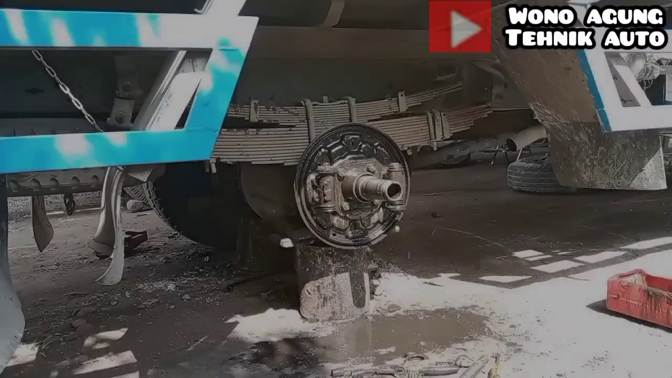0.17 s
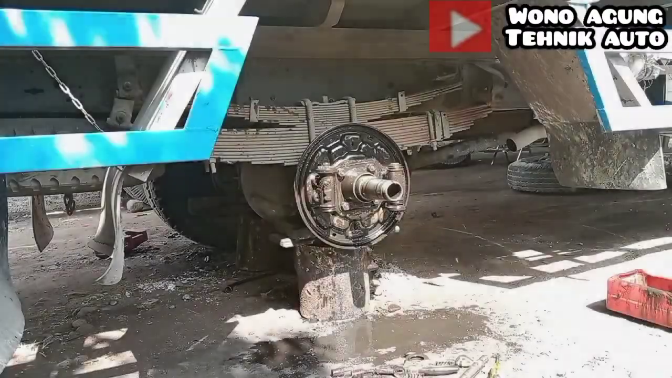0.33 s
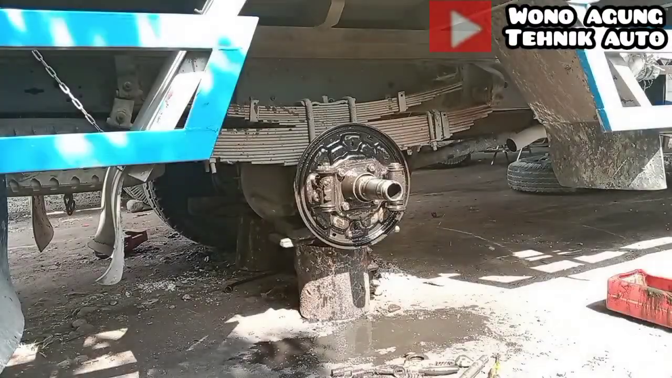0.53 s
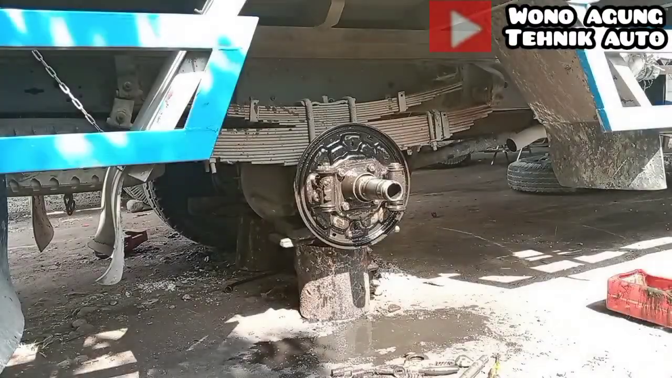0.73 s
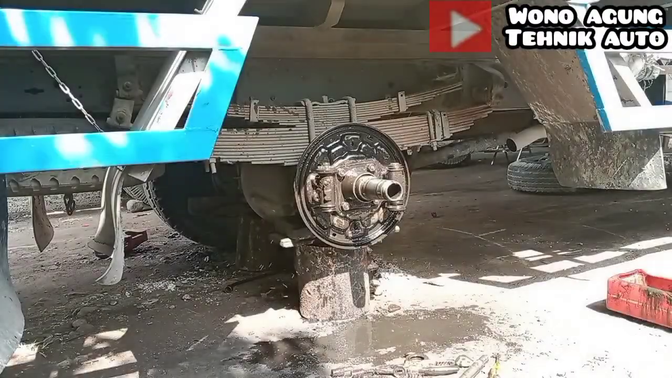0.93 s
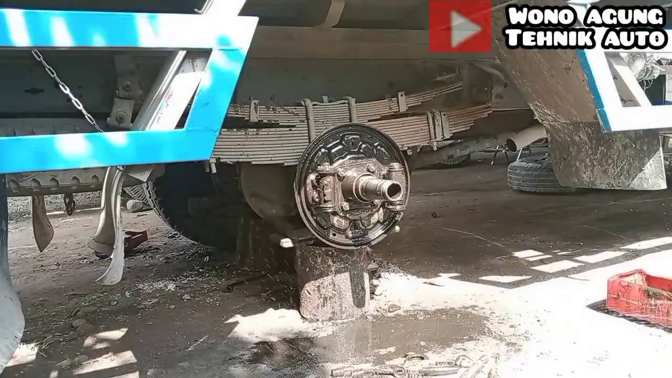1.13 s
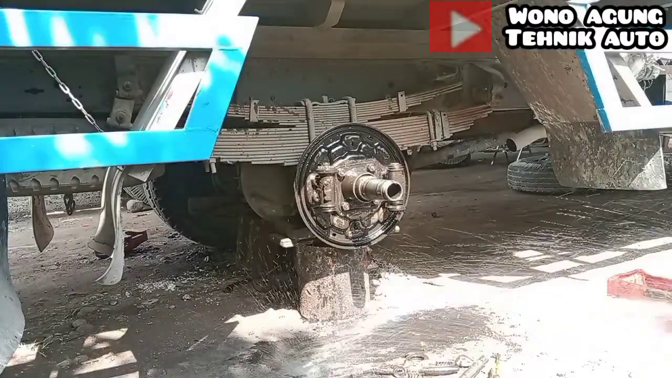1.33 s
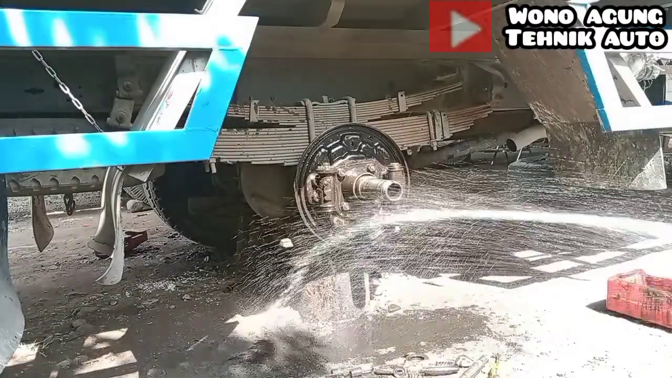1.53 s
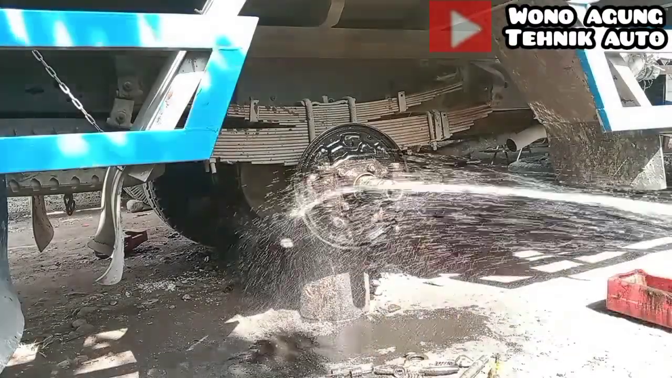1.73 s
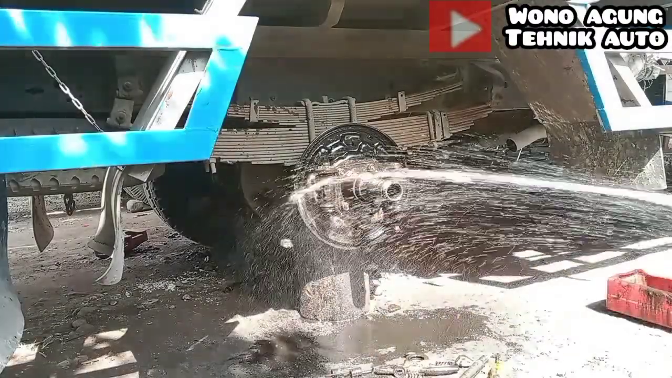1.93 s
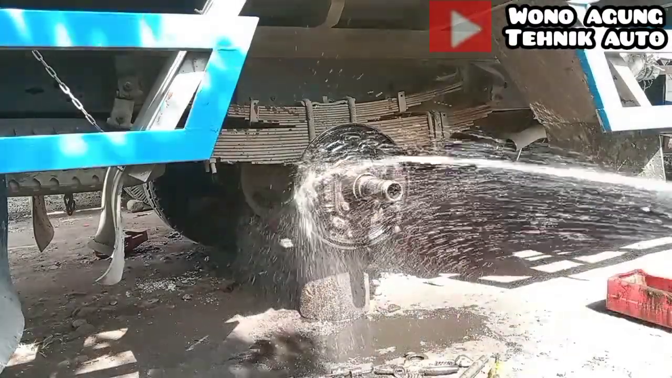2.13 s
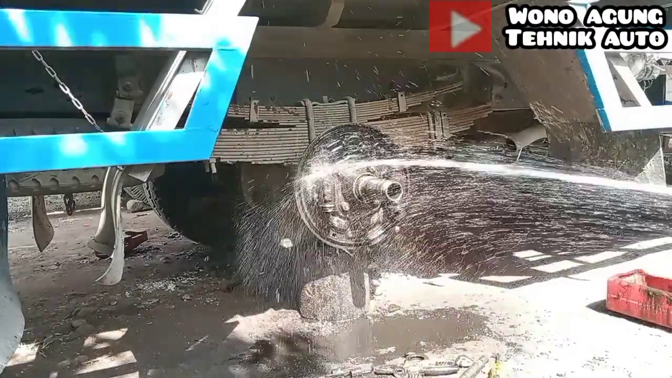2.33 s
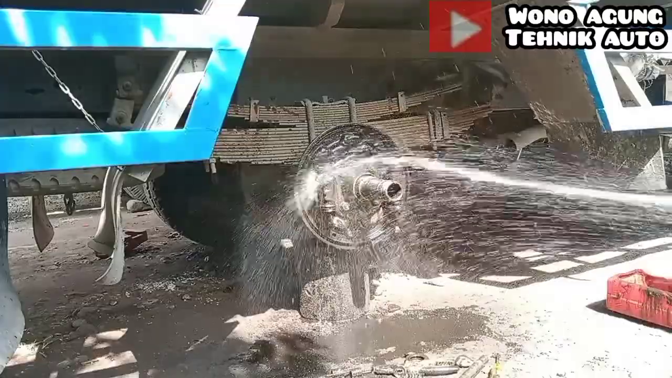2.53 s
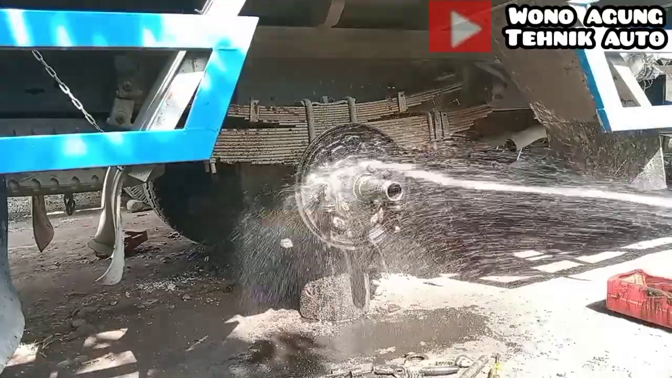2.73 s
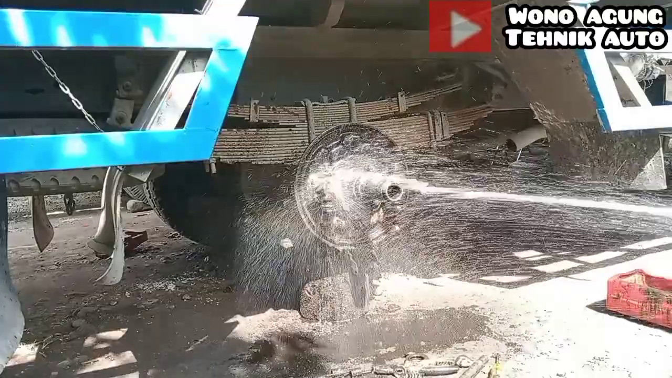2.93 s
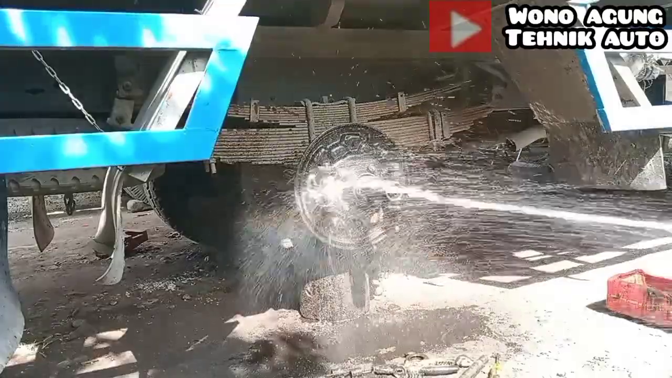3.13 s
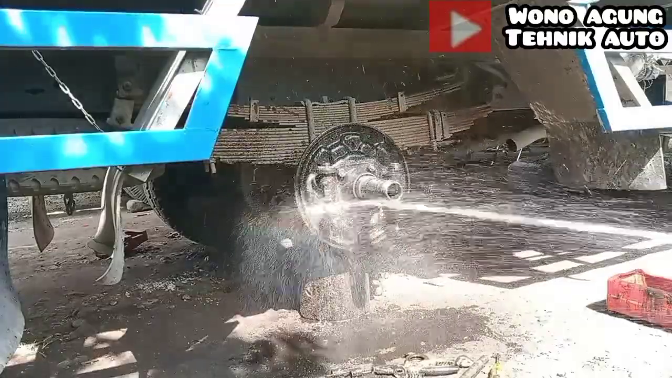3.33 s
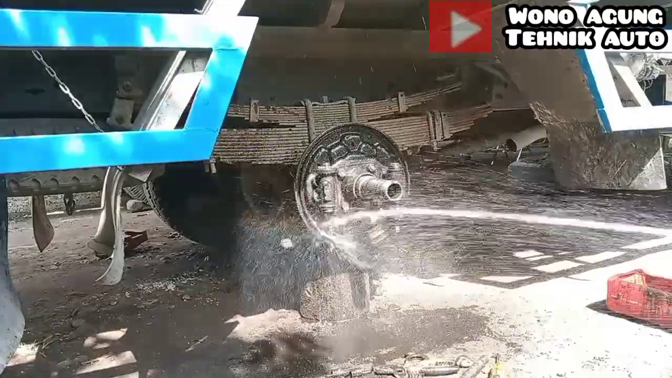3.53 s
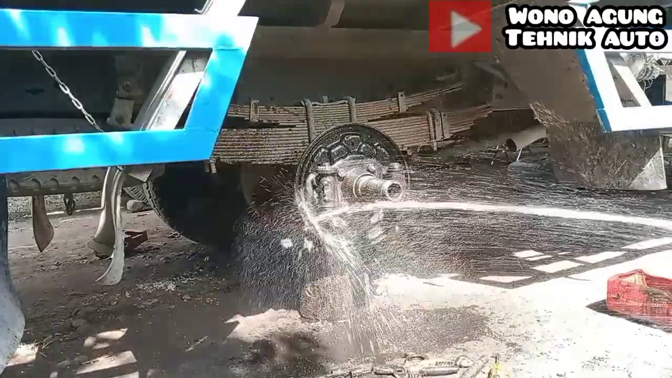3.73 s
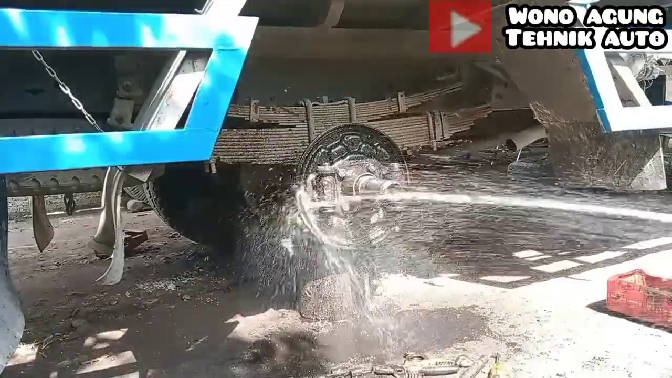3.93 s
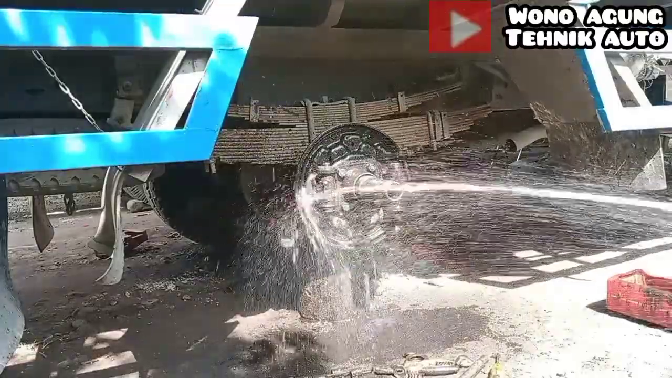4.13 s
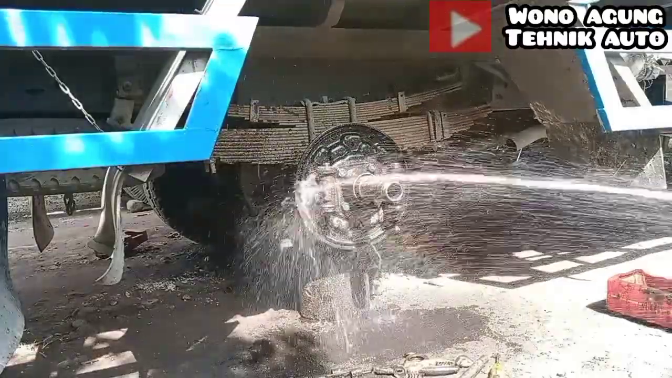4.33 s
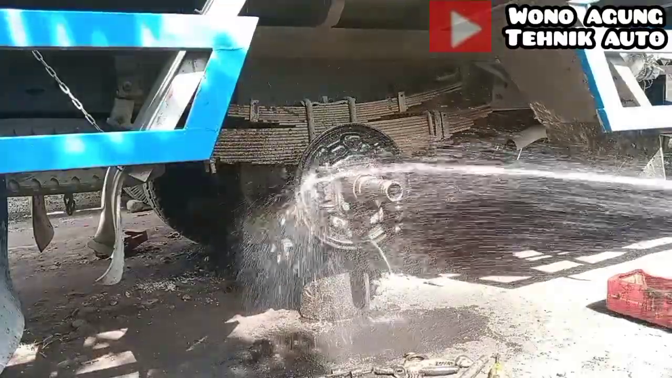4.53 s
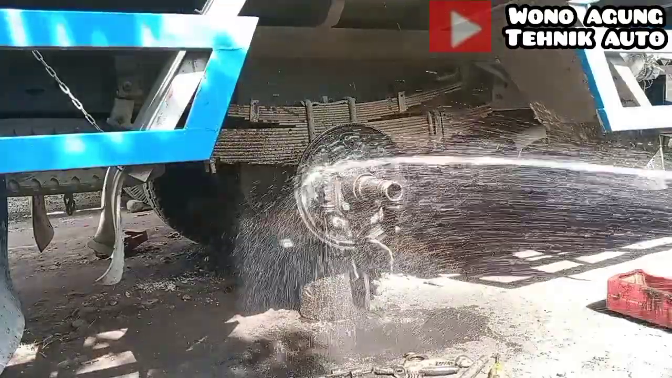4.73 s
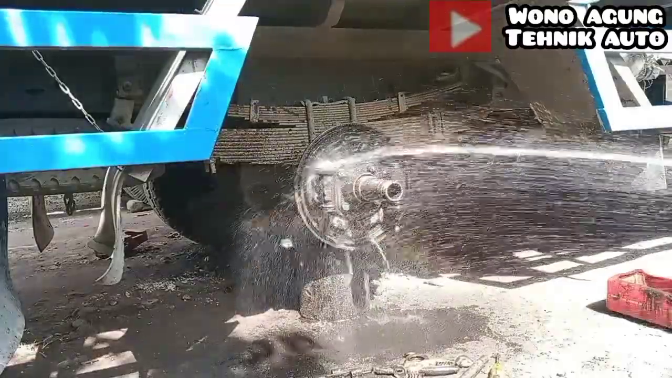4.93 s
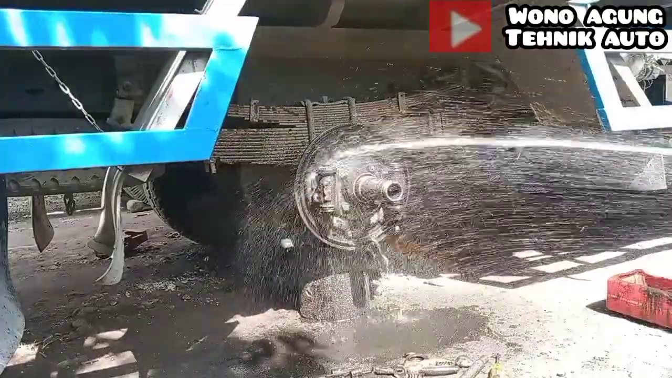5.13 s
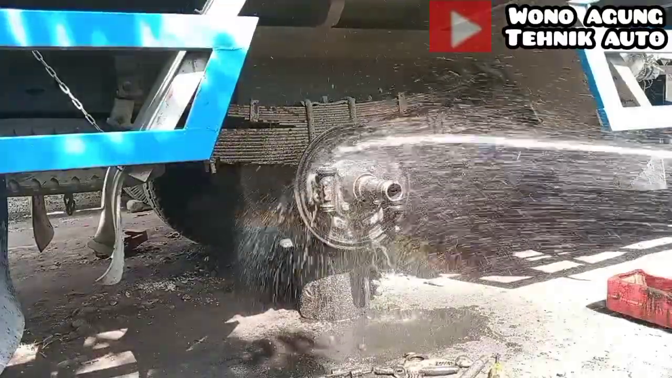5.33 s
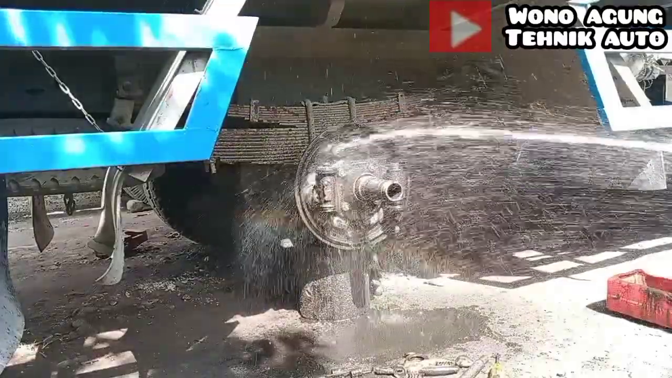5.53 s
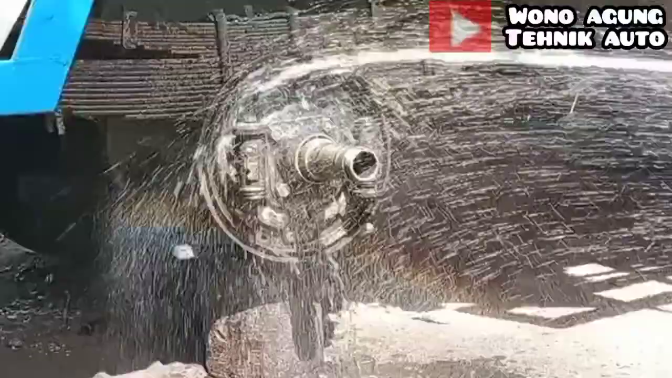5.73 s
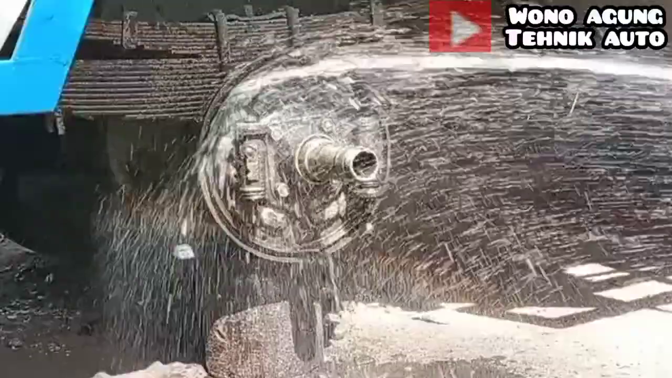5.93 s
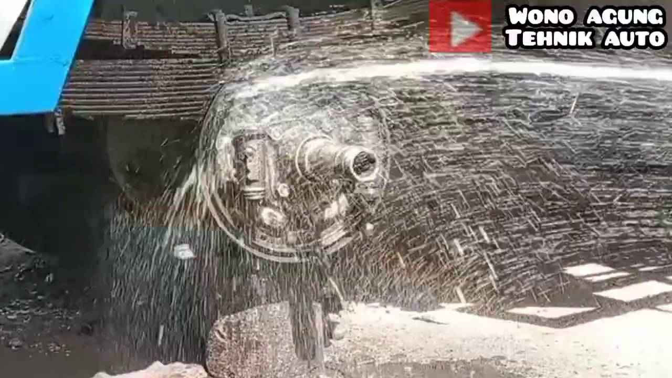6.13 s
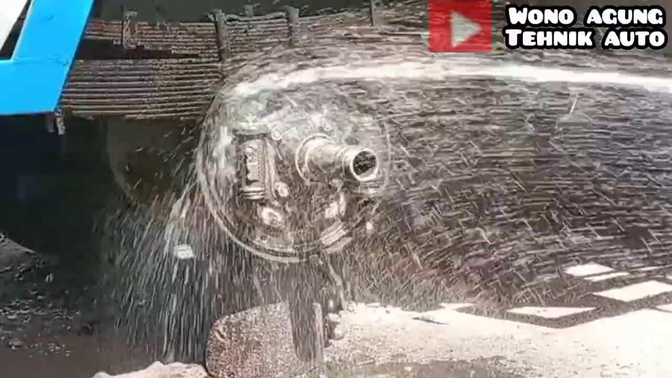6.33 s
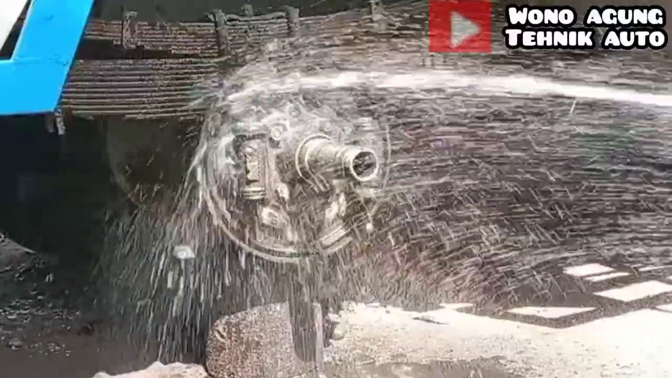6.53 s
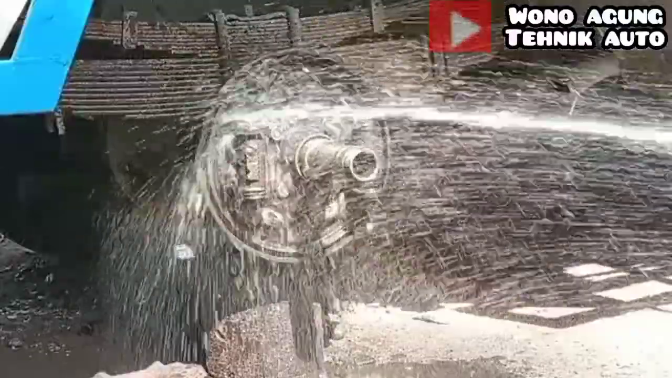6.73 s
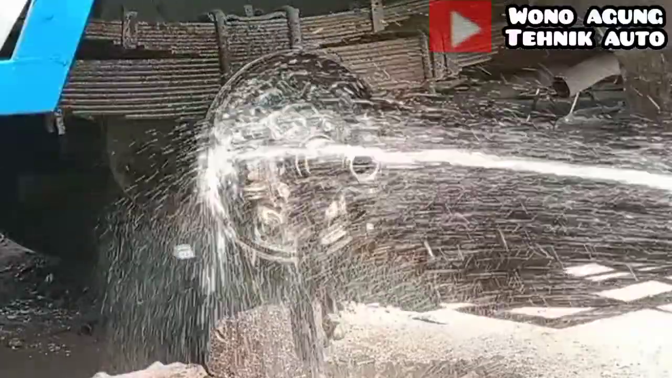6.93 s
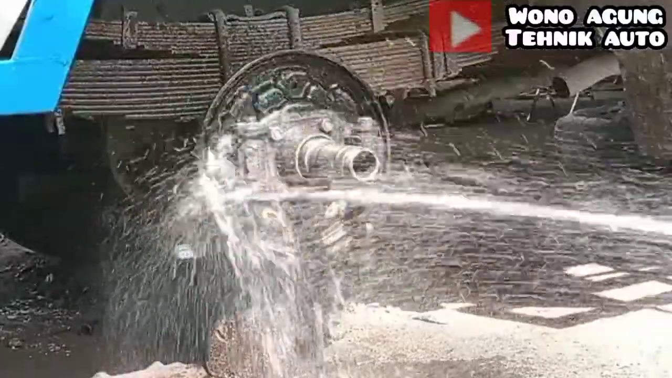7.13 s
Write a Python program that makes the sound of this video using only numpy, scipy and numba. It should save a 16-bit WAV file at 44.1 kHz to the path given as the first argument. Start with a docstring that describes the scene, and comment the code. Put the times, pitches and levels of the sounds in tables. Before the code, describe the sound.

From 0 to 0.8 s a quiet yard rumbles softly; water trickles and gulps, dull hollow knocks sound near 0.1 and 0.35 s, and sharp single drops tick and spit. The drops thicken from 0.8 s into a rising hiss, which thins briefly around 1.5 to 1.9 s. At 1.3 s a low engine drone swells in, uneven and growling, loud until about 3.5 s. Near 2 s a hard splat and hollow thump land as the full jet strikes the steel hub; more knocks follow to 2.6 s. The bright, crackling spray then stays dense, wavering in colour with tiny dropouts around 3.7 to 3.9 s and faint wet metallic ringing. Soft low engine throbs return now and then. Hollow watery knocks cluster at 4.8 s, strong cracks hit at 5.2, 5.35 and 5.45 s, and splattering hiss carries on until the cut at 7.2 s.

```python
"""A hose jet on wet ground and a steel wheel hub in a yard, with an engine in the distance.
At first the yard rumbles softly, water trickles and gulps, and hollow knocks and splats stand out.
The hiss of random drops builds up over two seconds; ringing filters make the wet steel sound.
From about 1.3 to 3.5 s the engine, a stack of sine waves and rumble, drones loudly, later in brief swells.
Splats, short noise cracks with an echo and a fizz, go on to the end; the strongest come near 2 and 5.3 s."""
import sys
import numpy as np
from scipy import signal
from scipy.fft import rfft, irfft
from scipy.io import wavfile
from scipy.ndimage import uniform_filter1d, minimum_filter1d
from numba import njit

SR = 44100
rng = np.random.default_rng(int(sys.argv[2]) if len(sys.argv) > 2 else 0)


def wav_out(sig):
    """Save sig, one row per channel (or a flat mono array), as 16-bit PCM at SR to the path in sys.argv[1]."""
    wavfile.write(sys.argv[1], SR, np.round(np.clip(np.atleast_2d(sig).T, -1, 1) * 32767).astype(np.int16))


N = 316197  # length in samples

# How strong the jet is before its brief lulls: t/s, spray level/dB, heavy drops level/dB
JET_LEVELS = [(0.0, -57.5, -48), (0.14, -47.5, -54), (0.26, -46.5, -52), (0.52, -44.5, -53),
              (0.64, -43.5, -63), (0.76, -43, -72), (0.86, -38.5, -49), (1.0, -35, -42.5),
              (1.18, -34.5, -48), (1.26, -33, -40.5), (1.38, -35, -45), (1.44, -41, -75), (1.62, -44, -62),
              (1.74, -38, -45.5), (1.84, -47, -69), (1.96, -28.5, -34.5), (2.08, -28, -32),
              (2.12, -34, -43), (2.41, -33, -43.5), (2.56, -30.5, -36), (2.97, -32, -45),
              (3.33, -30.5, -41.5), (3.55, -29, -39.5), (3.71, -28.5, -40.5), (3.93, -30, -38.5),
              (4.29, -30.5, -38.5), (4.41, -33, -36.5), (4.49, -28.5, -37), (4.63, -29.5, -37),
              (4.71, -36, -43.5), (4.91, -33.5, -41), (5.19, -27.5, -40), (5.49, -28.5, -37.5),
              (5.65, -30.5, -47.5), (5.85, -31.5, -42), (5.97, -27.5, -31.5), (6.03, -28, -35.5),
              (6.41, -29, -39), (6.55, -28, -35), (6.95, -29.5, -37.5), (7.17, -30.5, -35.5)]
# Pitches at which the wet steel hub rings: f/Hz, width/Hz, level/dB among the modes
HUB_MODES = [(994, 32, -10.5), (1373, 74, 2), (1562, 120, -13), (1703, 50, -11), (2063, 52, -1.5),
             (2310, 100, 8), (2740, 34, 3.5), (3100, 56, 8), (3446, 30, 9.5), (4140, 52, 7), (4790, 37, 0)]
TRICKLE_TOP_HZ = 2000  # the trickle rings the hub's modes below this, the heavy drops those above
SWELL_DB, SWELLS_PER_S = 4.5, 12  # how far and how often the level of a hub mode wanders
DRIFT = .015  # share by which the ringing pitches wander as the water film changes
PATCHY_DB = 10  # how deeply the dull water sounds hollow out
GROUND_ECHO_S = .0021  # delay of the echo off the ground


def undb(db):
    """Turns decibels into a plain gain."""
    return 10 ** (np.asarray(db) / 20)


def unit(x):
    """Scales a sound to an rms of 1."""
    return x / np.sqrt(np.mean(x ** 2))


def curves(table):
    """Joins the columns of a table by straight lines in time, one value a sample."""
    s, *columns = np.transpose(table)
    return [np.interp(np.arange(N) / SR, s, c) for c in columns]


def colour(x, points):
    """Filters with the given (f/Hz, gain/dB) curve, without any sound ahead of its cause."""
    hz, db = np.transpose(points)
    grid_hz = np.linspace(1, SR / 2, 2049)
    gain = undb(np.interp(np.log(grid_hz), np.log(hz), db))
    # folding the cepstrum (the spectrum of the log gain) puts the whole response after time zero
    cepstrum = irfft(np.log(gain))
    cepstrum[1:2048] *= 2
    cepstrum[2049:] = 0
    response = irfft(np.exp(rfft(cepstrum)))
    rows = signal.fftconvolve(np.atleast_2d(x), response[None], axes=1)
    return rows[:, :x.shape[-1]].reshape(x.shape)


def band(x, lo_hz, hi_hz):
    """Keeps only the sound between two pitches."""
    return signal.sosfilt(signal.butter(5, [lo_hz, hi_hz], "band", fs=SR, output="sos"), x)


@njit
def svf(x, hz, q):
    """Resonator whose centre may move, with a gain of 1 there; a higher q is narrower."""
    y, b, l = np.empty(len(x)), 0., 0.
    for i in range(len(x)):
        g, k = np.tan(np.pi * hz[i] / SR), 1 / q
        v = (b + g * (x[i] - l)) / (1 + g * (g + k))
        b, l, y[i] = 2 * v - b, l + 2 * g * v, k * v
    return y


def walk(rate):
    """Wanders from one random level to the next, rate times a second, with a spread near 1."""
    k = int(SR / rate)
    steps = np.repeat(rng.standard_normal(N // k + 1), k)
    return 1.344 * uniform_filter1d(steps, k)[:N]


def span(start_s, end_s, fade_s):
    """1 between the two times, with soft ends."""
    t = np.arange(N) / SR
    return np.clip(np.minimum(t - start_s, end_s - t) / fade_s + .5, 0, 1)


def burst(start_s, length_s, attack_s, release_s):
    """Rises, holds, then dies away."""
    t = np.arange(N) / SR - start_s
    return np.clip(t / attack_s, 0, 1) * np.exp(-np.maximum(t - length_s, 0) / release_s)


def drops(per_s, spread_db, tail_s):
    """Random impacts of unequal but bounded size, each a burst of noise that dies away."""
    size_db = spread_db * np.minimum(rng.exponential(size=N), 4)
    hits = (rng.random(N) < per_s / SR) * undb(size_db) ** 2
    # the tail acts on power, so the amplitude takes twice as long to die away
    power = signal.lfilter([1], [1, -np.exp(-1 / (tail_s * SR))], hits)
    return np.sqrt(power) * rng.standard_normal(N)


def patchy(x, lo_hz, hi_hz, spread_db, rate):
    """Splits a sound into quarter-octave strips that hollow out on their own."""
    edges = lo_hz * 2 ** np.arange(0, np.log2(hi_hz / lo_hz) + .2, .25)
    return sum(undb(-spread_db * np.abs(walk(rate))) * band(x, a, b) for a, b in zip(edges, edges[1:]))


def three_bands(x, lowest_hz):
    """Gives a sound the spray's colour and splits it into dull, middle and sharp parts."""
    # Colour of the spray: f/Hz, level/dB per Hz
    spray_colour = [(600, -59), (1000, -30.5), (1900, -21.5), (2360, -15), (2960, -10), (3300, -5.5),
                    (3960, -8), (5060, -1), (5750, 1.5), (8450, -4.5), (9200, -6), (14900, -1.5),
                    (16000, 2)]
    x = colour(x, spray_colour)
    return [band(x, lowest_hz, 4690), band(x, 4883, 9160), band(x, 9430, 17670)]


def hub_ring(water, modes, drifts_per_s):
    """Water makes the steel ring: each mode is a resonator, fed in its own swells and drifting in pitch."""
    ring = 0
    for hz, width_hz, db in modes:
        pitch = hz * (1 + DRIFT * walk(drifts_per_s))
        mode = unit(svf(water, pitch, hz / width_hz))
        ring = ring + undb(db + SWELL_DB * walk(SWELLS_PER_S)) * mode
    return unit(ring)


def yard_murmur():
    """Filtered noise that wavers in level: the background of the yard."""
    # Colour of the background: f/Hz, level/dB per Hz
    yard_colour = [(12, -14), (25, -28.5), (91, -6.5), (147, -10.5), (340, -32), (520, -31), (750, -31),
                   (1180, -48), (2130, -40), (4500, -45), (6000, -73)]
    noise = band(colour(rng.standard_normal(N), yard_colour), 19, 5000)
    return undb(-52) * unit(noise * undb(4.1 * walk(10)))


def lulls():
    """Gain that dips in the brief gaps of the spray."""
    # Gaps: start t/s, end t/s, level/dB
    gaps = [(0.288, 0.35, -5), (0.59, 0.607, -2), (1.53, 1.594, -6), (1.788, 1.81, -5), (1.832, 1.851, -18),
            (1.865, 1.907, -8.5), (3.16, 3.207, -2.5), (3.697, 3.711, -12.5), (3.718, 3.746, -30),
            (3.81, 3.835, -15), (3.863, 3.904, -8.5), (4.068, 4.117, -4.5), (5.155, 5.264, -6),
            (5.749, 5.76, -7), (6.04, 6.1, -3), (6.293, 6.327, -6), (6.923, 6.943, -6)]
    return undb(sum(db * span(a, b, .02) for a, b, db in gaps))


def jet():
    """Drops patter in flurries over a smooth hiss; the heavy ones also ring the wet steel."""
    spray_db, heavy_db = curves(JET_LEVELS)
    # the mist follows the spray more gently: -29.5 dB at a spray of -32.5 dB, building up in 0.18 s
    build_up = 1 - np.exp(-np.arange(N) / SR / .18)
    mist = undb(-29.5 + .81 * (spray_db + 32.5)) * build_up
    flurry = undb(0.4 * walk(45) + 1.8 * walk(130))
    water = flurry * (unit(drops(700, 2.16, 0.00078)) + 0.76 * rng.standard_normal(N))
    dull, middle, sharp = three_bands(water, 1520)
    # fine droplets of their own add to the mist
    fine = three_bands(drops(1100, 6.0, 0.00056), 1800)[2]
    sharp = unit(sharp) + 0.79 * unit(fine)
    ring = hub_ring(water, [mode for mode in HUB_MODES if mode[0] > TRICKLE_TOP_HZ], 5)
    # the jet wanders, so its colour shifts
    dull = unit(patchy(dull, 1480, 5000, PATCHY_DB, 9)) * undb(0.82 * walk(25))
    heavy = unit(dull + .55 * ring)
    middle = unit(patchy(middle, 3990, 11000, 2.3, 13))
    return lulls() * (undb(heavy_db) * heavy + undb(spray_db) * middle + mist * unit(sharp))


def grounded(x):
    """Adds the echo off the wet ground, which combs the hiss."""
    lag, echo = int(GROUND_ECHO_S * SR), undb(-12)
    return (x + echo * np.pad(x, (lag, 0))[:N]) / np.hypot(1, echo)


def trickle():
    """Water running off under the hub feeds its lowest modes, each in its own swells."""
    # Strength of the trickle before the lulls: t/s, level/dB
    trickle_levels = [(0.0, -39), (0.06, -44), (0.44, -68), (0.76, -73.5), (1.02, -64), (1.48, -68),
                      (1.98, -57), (2.1, -52.5), (2.37, -43), (2.43, -46), (2.79, -54.5), (3.53, -50),
                      (3.67, -50.5), (4.27, -52), (4.51, -47), (4.93, -47), (5.13, -46.5), (5.6, -44.5),
                      (5.72, -43), (5.85, -42.5), (6.25, -50.5), (6.61, -44), (6.85, -52.5), (7.17, -49)]
    water = unit(drops(400, 5.8, 0.0053)) + 0.59 * rng.standard_normal(N)
    ring = hub_ring(water, [mode for mode in HUB_MODES if mode[0] < TRICKLE_TOP_HZ], 5.4)
    wash = unit(patchy(water, 993, 2400, PATCHY_DB, 11))
    return undb(curves(trickle_levels)[0]) * lulls() * band(ring + 0.5 * wash, 947, 3300)


def dipped(x):
    """Takes a wandering band out of the sound of the water."""
    # Missing band: t/s, f/Hz, depth (0 to 1)
    dip_path = [(0, 2550, 0), (0.3, 2300, 1), (0.6, 2260, 1), (0.9, 2500, 0.75), (1.25, 2300, 1),
                (1.5, 2500, 0.8), (2.0, 1850, .6), (2.17, 2800, 0.06), (2.32, 2900, 1), (2.5, 2700, 1),
                (2.66, 2320, 0.6), (2.85, 2100, 0.6), (3.2, 2130, .8), (3.4, 2330, 0.65), (3.55, 2580, 1),
                (3.7, 2240, 0.9), (4.1, 2040, 0.7), (4.45, 1830, 0.6), (4.7, 2800, 0), (5.0, 2720, 0.4),
                (5.3, 2780, 0.64), (5.5, 1980, 0), (5.7, 2560, 0), (5.92, 1730, 0.75), (6.4, 1820, 0.16),
                (7.05, 1900, 0.7), (7.17, 2100, .7)]
    hz, depth = curves(dip_path)
    return x - np.clip(depth, 0, .97) * svf(x, hz, 2.87)


def slosh():
    """Water gulps in a hollow: splashes through resonators whose pitch leans to the loudest gulp."""
    # Gulps: start t/s, length/s, level/dB, centre f/Hz
    gulp_rows = [(-.02, 0.076, -46.5, 880), (0.12, 0.041, -46, 800), (0.338, 0.076, -48, 875),
                 (0.632, 0.006, -44.5, 2320), (0.813, 0.011, -40, 1820), (1.273, 0.064, -53, 1600),
                 (1.622, 0.069, -56, 1290), (1.924, 0.053, -42.5, 1140), (2.226, 0.064, -44, 1380),
                 (2.295, 0.061, -38, 1200), (2.326, 0.096, -34, 1210), (2.555, 0.057, -37.5, 1100),
                 (2.766, 0.036, -53, 885), (3.569, 0.12, -48.5, 1450), (4.134, 0.041, -55, 1540),
                 (4.416, 0.03, -53, 1060), (4.597, 0.031, -47.5, 1310), (4.749, 0.057, -35, 1250),
                 (4.828, 0.078, -36.5, 1220), (5.07, 0.099, -48.5, 790), (5.37, 0.022, -37, 1410),
                 (6.155, 0.033, -42.5, 1290), (6.605, 0.12, -57, 750)]
    attack_s, release_s = .0075, .022
    parts = [undb(db) * burst(s, length, attack_s, release_s) + 1e-9 for s, length, db, _ in gulp_rows]
    gain = sum(parts)
    hz = sum(part * row[-1] for part, row in zip(parts, gulp_rows)) / gain
    splashes = unit(drops(300, 4.5, .006)) + 0.61 * rng.standard_normal(N)
    hollow = unit(svf(svf(svf(splashes, hz, 1.4), hz, 1.4), hz, 1.4))
    overtone = unit(svf(svf(splashes, 1.58 * hz, 2.5), 3.2 * hz, 2.5))
    narrow = unit(svf(splashes, hz, 16.))
    return gain * band(hollow + 0.66 * overtone + 0.065 * narrow, 450, 2460)


def engine():
    """Multiples (orders) of one low pitch waver on their own, and broad rumble blurs them."""
    # Path of the engine: t/s, third order f/Hz, level/dB, upper band level/dB above that level
    engine_path = [(0, 125, -57, 0), (1.05, 118, -52.5, -14.5), (1.3, 117, -31.5, -29),
                   (1.5, 119, -26, -24), (1.6, 130, -25, -11.5), (1.66, 141, -21.5, -16),
                   (1.72, 140, -24.5, -16), (1.8, 136, -20.5, -11.5), (1.88, 133, -32.5, -6.5),
                   (1.97, 136, -23, -27), (2.06, 136, -23.5, -22), (2.14, 136, -33, -24),
                   (2.24, 135, -24.5, -22), (2.285, 134, -26, -26), (2.34, 133, -21, -12),
                   (2.42, 132, -24, -15), (2.51, 130, -23.5, -7.5), (2.62, 128, -21.5, -23),
                   (2.7, 128, -24, -9), (2.78, 127, -21.5, -23), (2.85, 127, -24, -19),
                   (2.94, 126, -24, -27), (3.02, 126, -24.5, -8.5), (3.1, 125, -20, -25.5),
                   (3.18, 124, -27.5, -20), (3.25, 120, -20.5, -8), (3.34, 120, -25.5, -11),
                   (3.46, 120, -26, -12), (3.55, 119, -44, -11), (4.6, 112, -59.5, -3),
                   (4.9, 150, -48, -11.5), (5.57, 148, -59, -4), (5.66, 106, -50, -12),
                   (5.84, 106, -47, -2), (5.93, 144, -53, -13), (7.17, 143, -54, -11.5)]
    # Its orders: multiple of the firing rate, level/dB
    order_levels = [(1, -28), (2, -7.5), (3, 3), (4, -5), (5, -15), (6, -18.5), (7, -25.5), (8, -35),
                    (9, -43), (10, -44)]
    # Its rumble: f/Hz, width/Hz, level/dB
    rumble_bands = [(98, 23, -27), (134, 65, 3), (197.6, 33, -11), (268, 45, -22.5)]
    # Brief swells added to the drone: start t/s, length/s, level/dB
    swell_rows = [(0.234, 0.14, -40), (0.429, 0.055, -43), (0.7, 0.061, -34), (0.86, 0.04, -43),
                  (1.093, 0.043, -44), (3.643, 0.13, -39), (3.832, 0.012, -39), (4.024, 0.19, -34.5),
                  (4.275, 0.11, -33.5), (4.453, 0.11, -38), (4.965, 0.1, -35), (5.44, 0.11, -29),
                  (5.656, 0.26, -41), (5.973, 0.15, -30.5), (6.367, 0.13, -35.5), (6.59, 0.096, -36.5),
                  (6.734, 0.14, -33.5), (7.039, 0.1, -37)]
    hz, db, upper_db = curves(engine_path)
    turns = np.cumsum(hz / 3 * (1 + .006 * walk(25)) / SR)
    orders = 0
    for k, order_db in order_levels:
        tone = np.sin(2 * np.pi * (k * turns + rng.random()))
        orders = orders + undb(order_db + 3.5 * walk(14)) * tone
    rumble = 0
    for f, width_hz, g in rumble_bands:
        centre, q = np.full(N, 1. * f), f / width_hz
        rumble = rumble + undb(g) * unit(svf(svf(rng.standard_normal(N), centre, q), centre, q))
    drone = unit(orders) + 0.56 * unit(rumble)
    swells = sum(undb(g) * span(s, s + length, .046) for s, length, g in swell_rows)
    low = (undb(db) + swells) * unit(band(drone, 42.5, 183.5))
    # the upper band follows the swells only a little
    upper_gain = undb(db + upper_db + 2 * walk(12)) * (1 + 0.082 * swells / undb(db))
    return low + upper_gain * unit(band(drone, 192.4, 364))


def knocks():
    """A soft blow rings the short modes near its centre pitch: sine waves that die away."""
    # Blows: t/s, peak level/dB, centre f/Hz, spread/octaves, share of the ring time (last two at least 0.1)
    blows = [(0.012, -38.5, 700, 0.63, 0.74), (0.121, -31.5, 485, 0.92, 0.34),
             (0.341, -26.5, 880, 0.8, 0.84), (0.344, -40, 420, 0.31, 0.49), (1.92, -15, 930, 0.54, 0.49),
             (1.922, -28, 367, 0.54, 0.48), (2.244, -26, 1270, 0.54, 1), (2.261, -24, 1510, 0.28, 0.096),
             (2.265, -32, 634, 0.22, 0.5), (2.334, -21, 1120, 0.5, 0.81), (2.515, -37, 664, 0.28, 0.82),
             (2.571, -30, 1070, 0.18, 0.93), (2.62, -25.5, 630, 0.21, 0.35), (2.76, -38, 1000, 0.28, 0.44),
             (2.795, -38, 630, 0.55, 0.79), (3.107, -47, 474, 0.41, 0.19), (3.714, -34, 810, 1.34, 0.27),
             (3.831, -38, 910, 0.93, 0.12), (3.842, -40, 700, 0.95, 0.094), (4.312, -44, 1260, 0.17, 0.5),
             (4.389, -30, 1360, 0.15, 0.32), (4.452, -36.5, 1040, 0.16, 0.74), (4.772, -17, 1230, 0.2, 1),
             (4.784, -14, 1200, 0.28, 0.47), (4.826, -16.5, 1180, 0.15, 0.47),
             (4.85, -26, 1260, 0.15, 0.59), (4.881, -25, 1340, 0.24, 0.59), (5.114, -47, 770, 0.33, 1),
             (5.681, -29.5, 734, 0.35, 0.75), (5.767, -27, 736, 0.21, 0.75),
             (5.768, -30.5, 1520, 0.18, 0.61)]
    # Modes of the hollow: f/Hz, level/dB, full time to fall by 60 dB/s
    hollow_modes = [(312, -7, 0.42), (431, 3.5, 0.16), (614, -17, 0.35), (624, 2, 0.18), (692, 9.5, 0.077),
                    (754, 2.5, 0.12), (1002, 1.5, 0.15), (1043, 3, 0.18), (1276, 13, 0.08),
                    (1247, -11, 0.2), (1514, 1, 0.15), (1810, -1, 0.16), (2020, -25, 0.072)]
    out, t = np.zeros(N + 8192), np.arange(8192) / SR
    scatter_db = 2 * rng.standard_normal((len(blows), len(hollow_modes)))
    for (s, db, centre_hz, spread, share), scatter in zip(blows, scatter_db):
        ring = np.zeros(len(t))
        for (hz, mode_db, t60), extra_db in zip(hollow_modes, scatter):
            nearness = np.exp(-.5 * (np.log2(hz / centre_hz) / max(spread, .1)) ** 2)
            decay = np.exp(-np.log(1000) * t / (t60 * max(share, .1)))
            ring += undb(mode_db + extra_db) * nearness * np.sin(2 * np.pi * hz * t) * decay
        ring *= 1 - np.exp(-t / 0.0036)  # soft start
        i = int(s * SR)
        out[i:i + len(t)] += undb(db) * ring / np.abs(ring).max()
    return out[:N]


def small_slugs():
    """Scatters small slugs of water at random; they follow the spray and weaken in its gaps."""
    # Mean/dB, spread/dB; rows: peak above the spray, then dull, sharp and fizz parts above the peak
    slug_levels = [(6.5, 3), (-16, 6), (3, 4), (-20, 6.5)]
    count = 50
    mean_db, spread_db = np.transpose(slug_levels)
    rows = mean_db + spread_db * rng.standard_normal((count, len(mean_db)))
    s = rng.random(count) * N / SR
    spray_db = np.interp(s, *np.transpose(JET_LEVELS)[:2])
    lull_db = 20 * np.log10(lulls()[(s * SR).astype(int)])
    rows[:, 0] += spray_db + 2 * lull_db
    return np.column_stack([s, rows]).tolist()


def splats():
    """Each slug of water cracks sharply, echoes off the ground, then fizzes out."""
    # Big slugs: t/s, crack peak level/dB in the middle band, dull part/dB and sharp part/dB above that peak,
    # rms level/dB of the fizz in its first 4 ms above the crack peak of the same part
    big_slugs = [(0.096, -33.5, 2.5, -15, -22), (0.209, -30, -9, -10, -6), (0.262, -30.5, -1, -3, -11),
                 (0.2367, -28.5, -5, 4, -24), (0.333, -35, -18, 15, -30), (0.386, -25.5, -3.5, -17, -7.5),
                 (0.411, -29, 1, -10, -22), (0.4321, -17.5, -1, -20, -19.5), (0.488, -27, 3.5, 3, -8.5),
                 (0.507, -32, 0, -8, -14), (0.531, -24, -5, 3, -16), (0.6396, -25, -1, -7, -17),
                 (0.658, -25, 1, -3, -25), (0.693, -22, -34, -11, -25), (0.7093, -19.5, -29, -28, -26),
                 (0.728, -28, -17, -8, -14), (0.806, -25, -10, -6, -12), (0.8125, -24, -3, -6, -19),
                 (0.8188, -20.5, 4, -12, -11), (0.855, -24, -3, 3, -10.5), (0.884, -23.5, 4, -8, -17),
                 (0.8913, -27, -4, 10, -10), (0.898, -20, -8, -1, -28), (0.903, -22, 4, -6, -15),
                 (0.9377, -21, -24, -5, -16), (0.986, -27.5, 2, -5, -12), (1.1032, -15, -36, -10, -17),
                 (1.3113, -20.5, -0.5, 2, -7), (1.3821, -21, -34, -3, -10), (1.519, -24, -30, -15, -17),
                 (1.597, -38, -34, 19, -27), (1.6306, -31, -7, 5, -4), (1.65, -22.5, -8.5, 1, -7.5),
                 (1.7563, -22, -16, 6.5, -16), (1.822, -23.5, -26, 1, -13), (1.906, -25, -6, 2, -22),
                 (1.941, -20, -1, 6, -15), (1.983, -19.5, 5.5, 3, -10.5), (2.0049, -0.5, -4.5, -18, -18),
                 (2.061, -14, 3.5, -13, -18), (2.0864, -13.5, 10.5, -18, -20), (2.111, -20, 10.5, -10, -16),
                 (2.134, -20, -3.5, -9, -7.5), (2.182, -17, -11.5, -1, -12), (2.3496, -12, 0.5, 5.5, -27),
                 (2.404, -11.5, -4, -1, -24), (2.4655, -8, -27, 8.5, -24), (2.516, -19, -5, -7, -2.5),
                 (2.5637, -17, -9, 0, -23), (2.702, -20, -13, 2, -6), (2.732, -10.5, -29, 2, -16),
                 (2.7527, -11, -21, -5, -27), (2.8533, -13.5, -2, -16, -22), (2.8796, -21, -22, -4, -21),
                 (2.8989, -16.5, -22, 6, -13), (2.9328, -11, -11, 5, -17), (2.9803, -8.5, -29, 4, -18),
                 (2.9888, -12.5, -11, -10, -14), (3.0571, -15.5, -1.5, -20, -10),
                 (3.111, -13.5, -7.5, 2, -10.5), (3.1388, -14, -10, 2, -10), (3.211, -17, -5.5, 0, -11),
                 (3.288, -25, 6, -10, -10.5), (3.3715, -14, -19, 4, -15), (3.4195, -13, -1, -3, -16),
                 (3.444, -14, -5.5, -4, -8.5), (3.5231, -23, -8, -4, -12), (3.5364, -19, 1, -7, -9),
                 (3.548, -19, -1, -2, -9), (3.567, -19, 0.5, -6, -12), (3.714, -8.5, -12, -5, -19),
                 (3.723, -9.5, -12, 1, -42), (3.831, -8, -13, 0, -29), (3.842, -16, -21, 2, -35),
                 (3.868, -21, -14, -4, -9), (4.0544, -15, 1, 6, -20), (4.064, -15, 3, -11, -19),
                 (4.0836, -20, -7, 15, -34), (4.1876, -12.5, 0, -11, -37), (4.153, -21.5, 1, -8, -14),
                 (4.2375, -10.5, -15, 4, -20), (4.241, -11, -14, 2, -18), (4.282, -22, -17, 0, -22),
                 (4.284, -18, -17, 0, -20), (4.303, -17, 3, -6, -16), (4.346, -20, -8, -6, -18),
                 (4.217, -23.5, 11, -6, -17), (4.2707, -8.5, -19, -11, -27), (4.2892, -9, -5, -5, -29),
                 (4.312, -18, 0.5, -14, -12), (4.329, -15.5, 1, -2, -15), (4.369, -12, -5, -12, -18),
                 (4.39, -23, -4, -6, -20), (4.406, -16, -6, 4, -14), (4.416, -19, -2, -4, -15),
                 (4.448, -13.5, -4, -8, -19), (4.437, -13, -3, -8, -24), (4.4742, -16.5, -6, 7, -16),
                 (4.4917, -12.5, -7, -4, -16), (4.4993, -11.5, -11, -9, -16), (4.508, -12.5, -3, 0, -15),
                 (4.546, -19, 1, -6, -10), (4.5791, -13, -22, 7, -17), (4.602, -13, -2.5, 2, -20),
                 (4.6248, -18, 2.5, -7, -14), (4.6967, -12, -14, 10, -30), (4.814, -13.5, -19, 12, -28),
                 (4.976, -19.5, -15, 7, -15), (5.0033, -18, -20, -4, -12), (5.024, -18, -27, 1, -8),
                 (5.0645, -10.5, -22, 2, -22), (5.11, -11.5, -9, -14, -14.5), (5.144, -21, -8, -10, -18),
                 (5.1627, -19, -6, -11, -11), (5.2002, 1, -11, -19, -32), (5.2326, -16, -9, 0, -13.5),
                 (5.2627, -19, -16, 0, -14), (5.2982, -22, -12, 13, -21), (5.3372, -1, -11, -1, -22),
                 (5.3843, -11, 2.5, 5.5, -12), (5.424, -17, -8, -4, -9), (5.44, -5, -9, -2, -23),
                 (5.458, -8.5, -17, -4, -10), (5.476, -10, -9, 8.5, -22), (5.499, -14, -23, -2, -14),
                 (5.524, -16, -16, -4, -15), (5.556, -17, -20, -4, -13), (5.5622, -14, -11, 3, -10),
                 (5.6047, -24, 2.5, -7, -9), (5.636, -14, -9, 11, -16), (5.649, -21, 1.5, -4, -12.5),
                 (5.676, -13.5, -21, -1, -15), (5.716, -16, -18, -4, -11), (5.789, -27.5, 1, -4, -8),
                 (5.828, -19, 2, 8, -19), (5.8374, -26, 10.5, -4, -11), (5.8767, -17.5, 3, -4, -13),
                 (5.907, -16, -11, -2, -8), (5.968, -21, -6, -6, -14), (6.0187, -18.5, 9, -13, -17),
                 (6.0542, -11, -5.5, -16, -13), (6.162, -18, 3, 0, -9.5), (6.188, -20, 1, -2, -10),
                 (6.2457, -8, -19, -8, -32), (6.2719, -30, -5, -4, -17), (6.3317, -12, -4, 5, -23),
                 (6.363, -22, 1, -4, -9), (6.39, -14.5, -0.5, -10, -12), (6.4202, -6, -3, -16, -19),
                 (6.4514, -8.5, -10, 6, -33), (6.5112, -15.5, 0.5, -12, -7.5), (6.567, -13, -19, 9, -19),
                 (6.5847, -25, -10, -4, -18), (6.693, -12, -12, -6, -14), (6.7196, -9, -15, 5, -26),
                 (6.738, -15, -7, -4, -11), (6.811, -21.5, 12.5, -19.5, -21), (6.862, -18, -4, -9, -15),
                 (6.909, -18, -14, -4, -11), (6.929, -12.5, -8, 4, -15), (6.981, -18, -8, -4, -20),
                 (6.997, -11, 1.5, 2, -17.5), (7.019, -14, -8, 0, -10.5), (7.087, -28, 10.5, 12, -8.5),
                 (7.1485, -7.5, 2, -23, -47)]
    out, t = np.zeros(N + 4096), np.arange(4096) / SR
    s, db, dull_db, sharp_db, fizz_db = np.transpose(big_slugs + small_slugs())[:, :, None]
    noise = rng.standard_normal((len(s), len(t)))
    lag, onset = int(GROUND_ECHO_S * SR), int(.004 * SR)
    crack = (0.29 + noise) * np.exp(-t / .00022)
    crack[:, lag:] += undb(-7) * crack[:, :-lag]
    fizz = noise * (1 - np.exp(-t / 0.00009)) * np.exp(-t / 0.011)
    slugs = 0
    parts = zip([dull_db, 0, sharp_db], three_bands(crack, 450), three_bands(fizz, 1080))
    for part_db, c, f in parts:
        crack_part = c / np.abs(c).max(axis=1, keepdims=True)
        fizz_part = f / f[:, :onset].std(axis=1, keepdims=True)
        slugs = slugs + undb(db + part_db) * (crack_part + undb(fizz_db) * fizz_part)
    for i, slug in zip((s[:, 0] * SR).astype(int), slugs):
        out[i:i + len(t)] += slug
    return out[:N]


def tones():
    """Faint thin sine tones come and go with soft ends, wavering in pitch and level."""
    # Tones: start t/s, end t/s, f/Hz, rms level/dB before it wavers
    tone_rows = [(0.89, 1.17, 1090, -64), (0.42, 0.76, 3330, -67), (0.93, 1.13, 3130, -58),
                 (0.95, 1.15, 3680, -60), (1.23, 1.31, 1830, -61), (1.3, 1.42, 1670, -62),
                 (1.92, 2.02, 436, -52), (3.6, 3.82, 604, -65), (5.03, 5.33, 2300, -55),
                 (5.5, 5.74, 2320, -55), (5.86, 5.89, 760, -53), (4.62, 4.69, 610, -59),
                 (4.98, 5.06, 630, -57), (5.09, 5.16, 750, -57)]
    out = np.zeros(N)
    for a, b, hz, db in tone_rows:
        turns = np.cumsum(hz + 12. * walk(40)) / SR
        gain = undb(db + 6 * walk(35)) * np.sqrt(2) * span(a, b, .03)
        out += gain * np.sin(2 * np.pi * turns)
    return out


def scene():
    """Adds up all sounds; the wandering dip acts on the jet, splats and trickle."""
    water = dipped(grounded(jet()) + trickle() + splats())
    return (yard_murmur() + water + slosh() + engine() + knocks() + tones())[None]


def record(dry):
    """A quick limiter holds down the loudest cracks; the phone cuts the top."""
    top_hz, ceiling, k = 15750, .78, int(.002 * SR)  # k: half the limiter's look-around, 2 ms
    cut = signal.ellip(10, .2, 70, top_hz, fs=SR, output="sos")
    heard = signal.sosfilt(cut, dry)
    headroom = np.minimum(1, ceiling / (np.abs(heard) + 1e-9))
    gain = uniform_filter1d(minimum_filter1d(headroom, 2 * k + 1), k)
    smooth = signal.butter(8, 1.06 * top_hz, fs=SR, output="sos")
    return signal.sosfilt(smooth, heard * gain)


dry = scene()
out = record(dry)
wav_out(out)
```